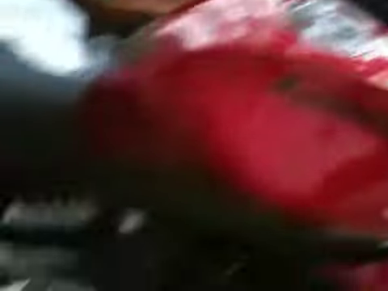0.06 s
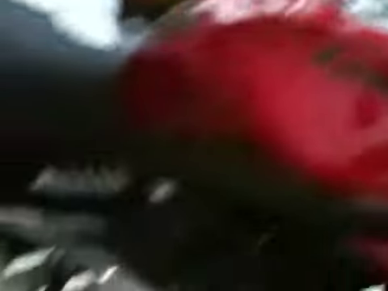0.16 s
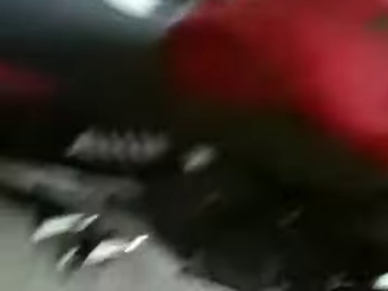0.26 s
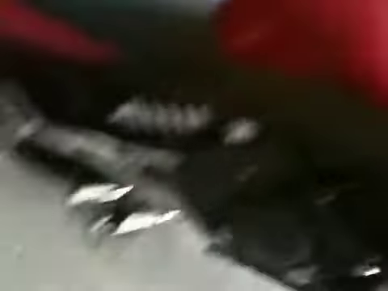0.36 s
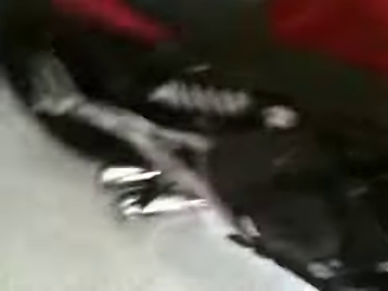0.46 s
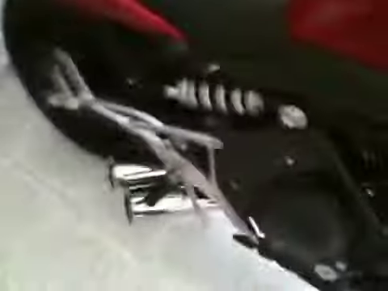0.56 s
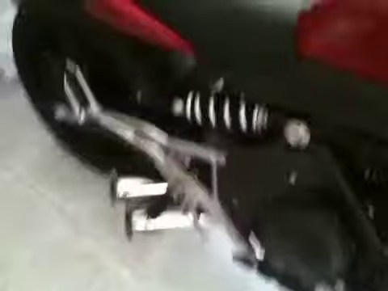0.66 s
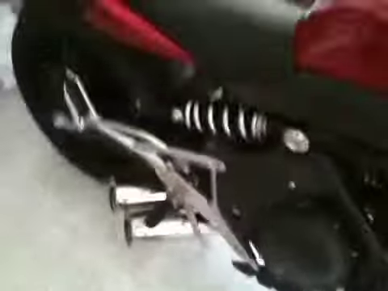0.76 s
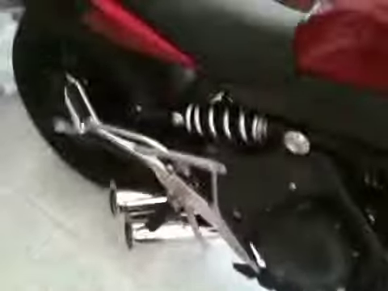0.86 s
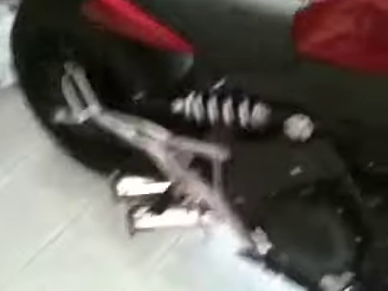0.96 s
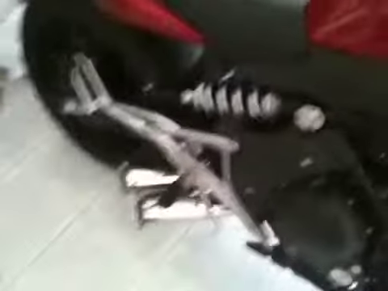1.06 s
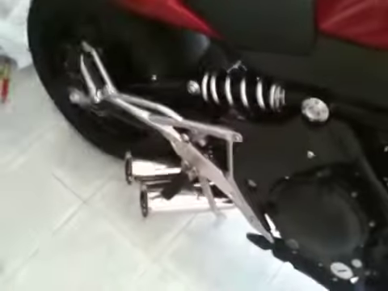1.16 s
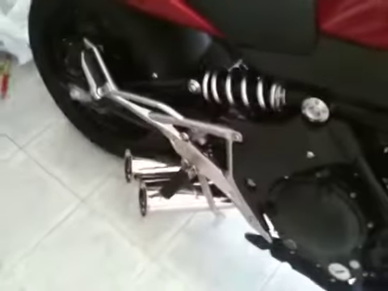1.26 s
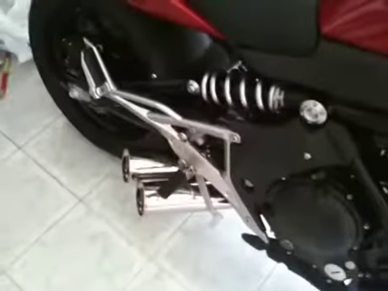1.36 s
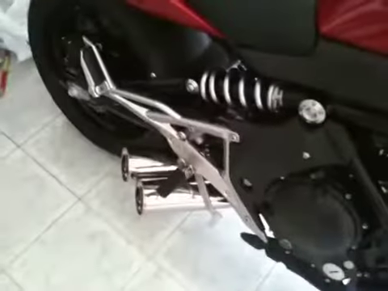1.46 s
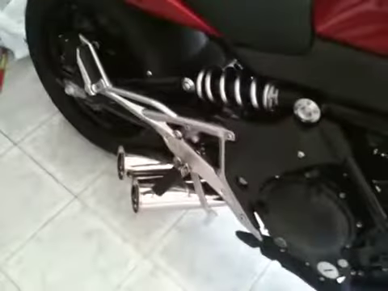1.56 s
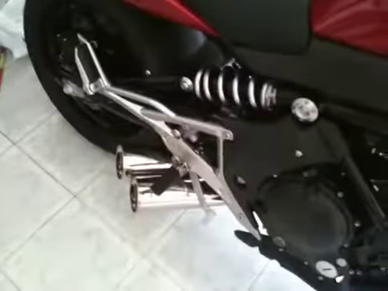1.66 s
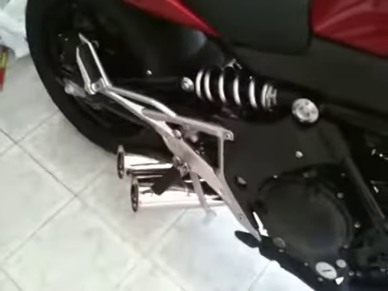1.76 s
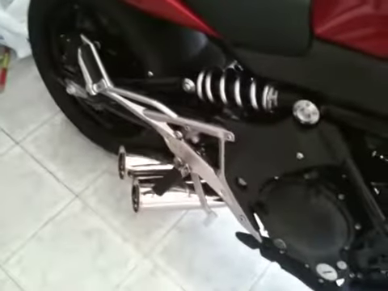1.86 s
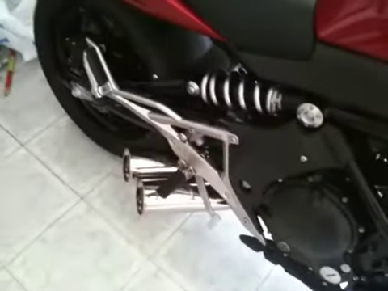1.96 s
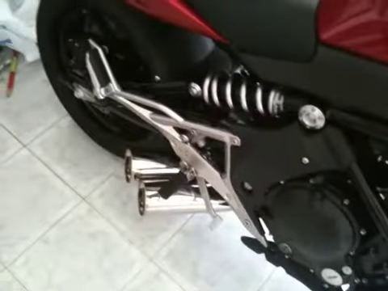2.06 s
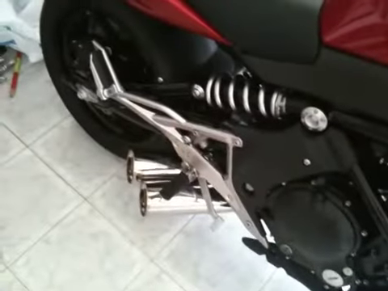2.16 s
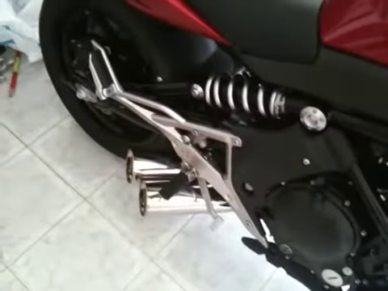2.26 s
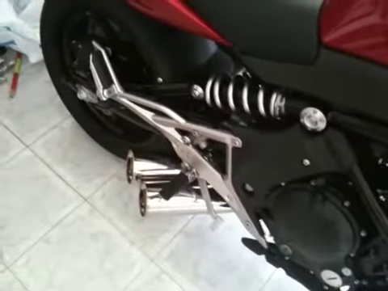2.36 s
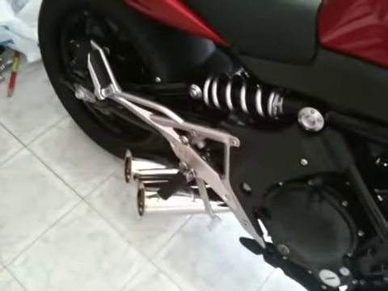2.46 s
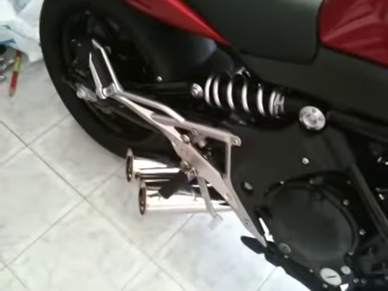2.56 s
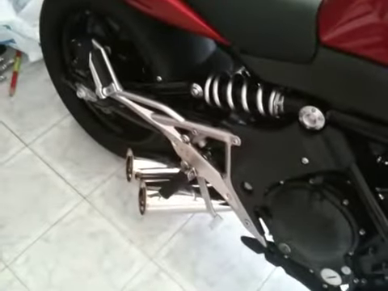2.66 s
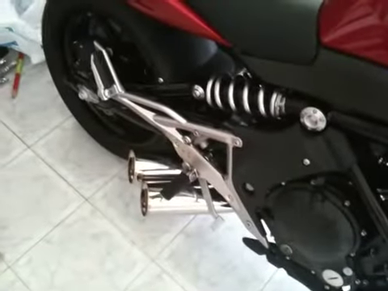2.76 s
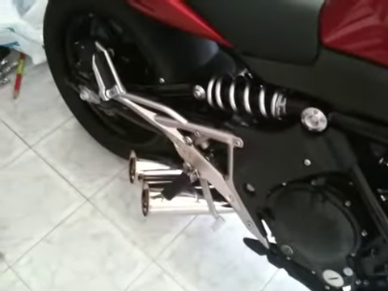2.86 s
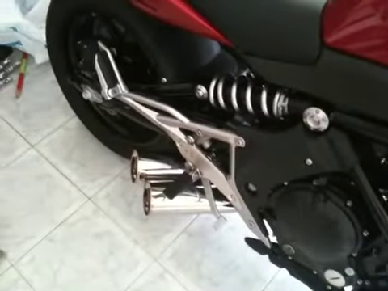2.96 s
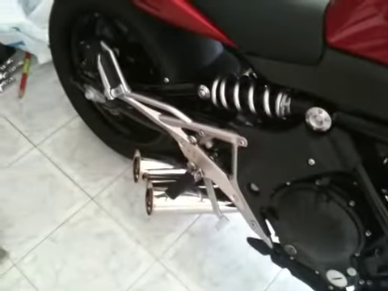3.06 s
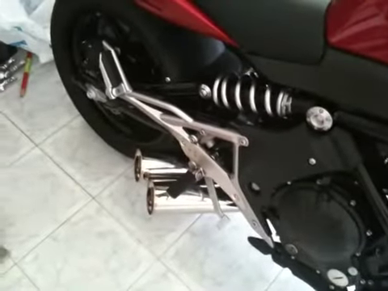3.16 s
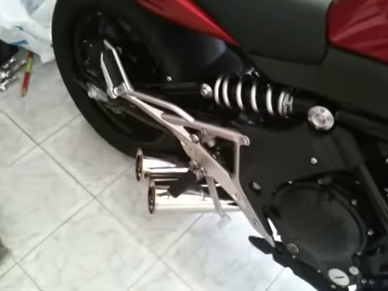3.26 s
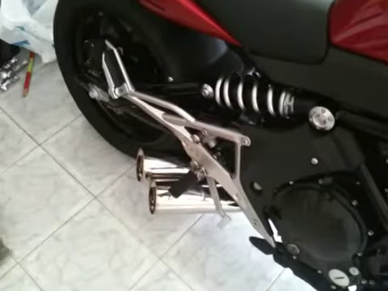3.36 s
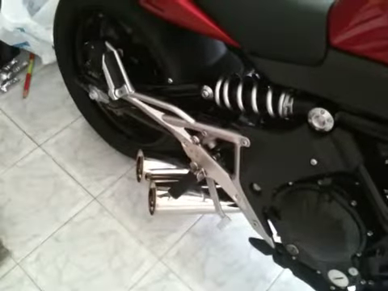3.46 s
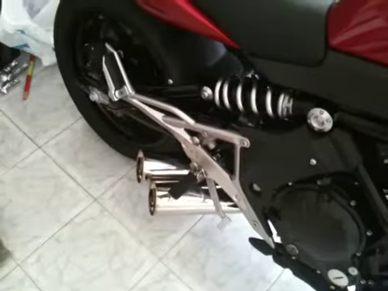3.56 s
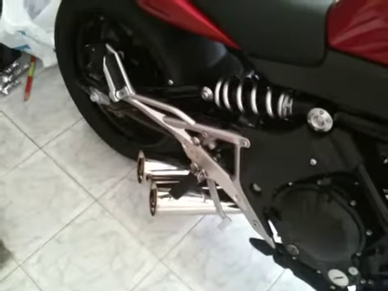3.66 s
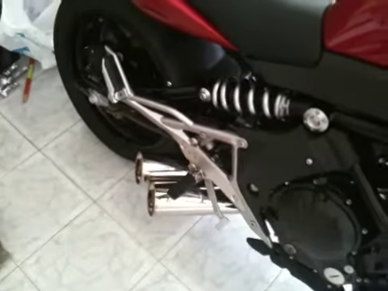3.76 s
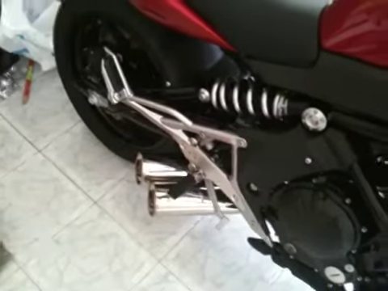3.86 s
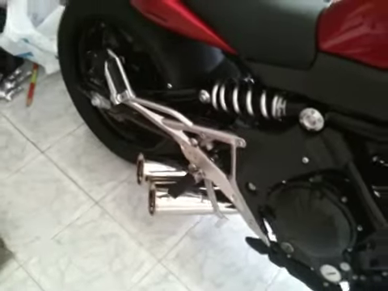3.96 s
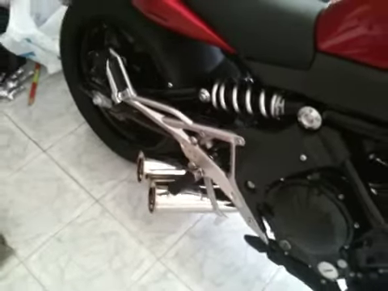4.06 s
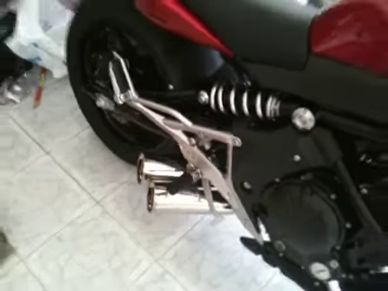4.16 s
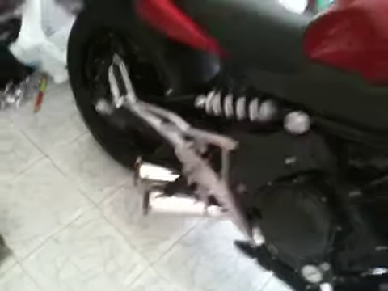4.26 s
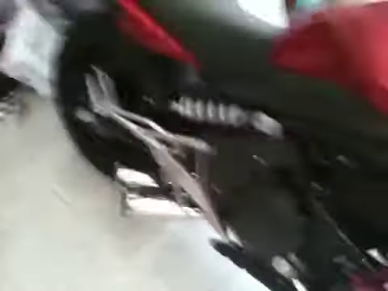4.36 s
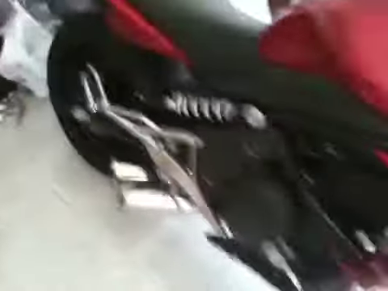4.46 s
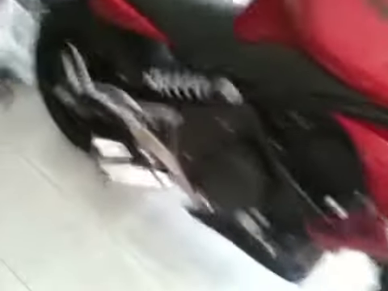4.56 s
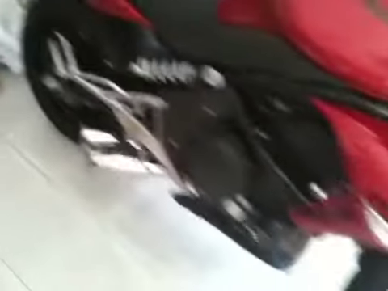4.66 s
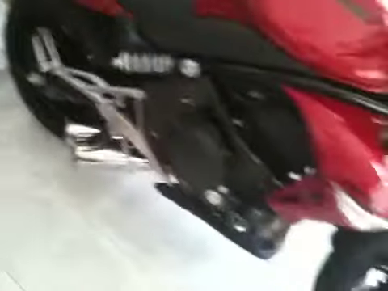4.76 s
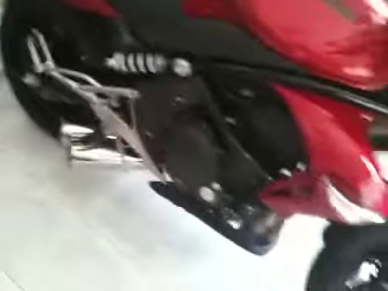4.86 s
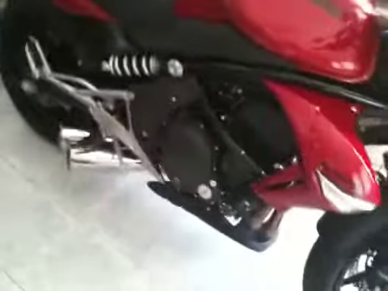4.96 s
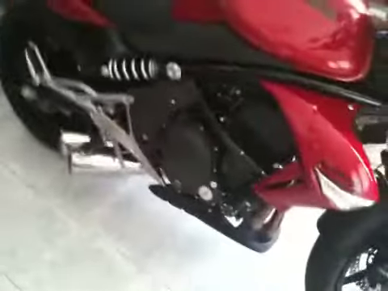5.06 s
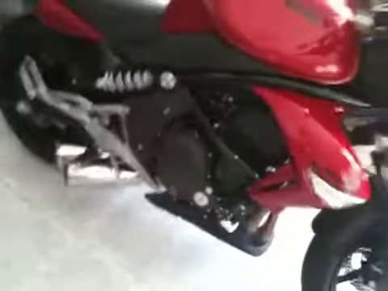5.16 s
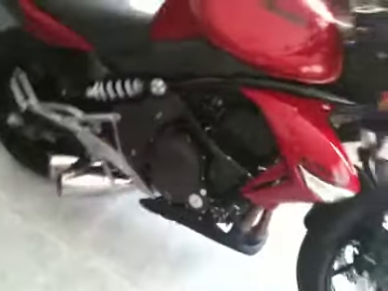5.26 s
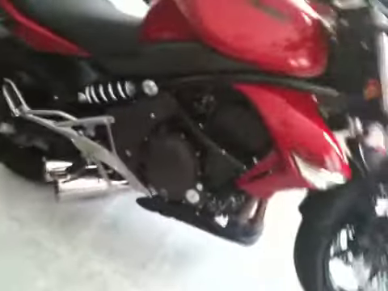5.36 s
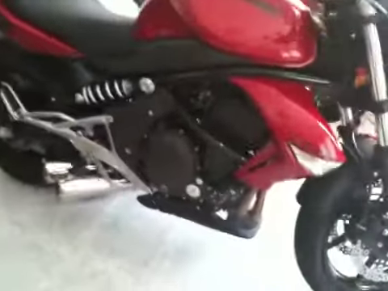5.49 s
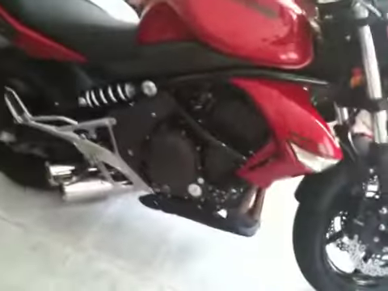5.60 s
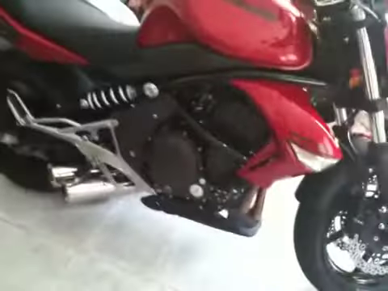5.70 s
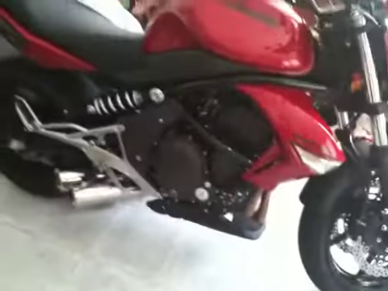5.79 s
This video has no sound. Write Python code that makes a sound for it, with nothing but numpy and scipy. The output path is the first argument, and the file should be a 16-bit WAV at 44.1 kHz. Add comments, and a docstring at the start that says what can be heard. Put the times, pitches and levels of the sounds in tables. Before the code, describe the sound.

A motorcycle is started in a tiled room, heard from close by. First come a few soft footsteps and a thin ignition whine, then a click and a short burst of cranking. The engine fires, falters with a few pops and picks up to a fast, throaty idle that echoes in the room. Its metallic ticking grows clearer as the microphone moves along the bike.

```python
"""Shoes tap and scuff softly in a tiled room, then a four-cylinder motorcycle starts up and idles.
The starter clacks and whines through two compressions; the engine catches, stumbles and runs.
Its uneven firings make the short exhaust pipe and the room boom and bark, while the valves rattle.
The tone shifts as the microphone moves along the bike, and the loudest peaks overload it softly."""
import sys
import numpy as np
from scipy import signal
from scipy.fft import rfft, irfft, next_fast_len
from scipy.io import wavfile

SR = 44100
rng = np.random.default_rng(int(sys.argv[2]) if len(sys.argv) > 2 else 0)


def wrap_up_sound(samples):
    """Save the sound to the file named by the first command line argument, as 16-bit audio."""
    columns = np.atleast_2d(samples).T
    # keep every value between -1 and 1, then stretch to whole-number steps
    tamed = np.clip(columns, -1, 1)
    steps = np.round(tamed * 32767).astype(np.int16)
    wavfile.write(sys.argv[1], SR, steps)


N = 257103
TIME = np.arange(N) / SR


# stray bangs of late-burning fuel: (time [s], boom level [dB], crack level [dB])
STRAY_BANGS = [(2.37, -14.5, 3), (2.3857, -1.5, 5), (2.41, -4, 5), (2.456, -8, 1), (2.47, -6, -22),
               (2.557, -14, -20), (2.576, -23, -23), (2.7311, -5, 1), (3.033, -20, 1), (3.533, -28, 1.5),
               (3.671, -28, 5.5), (4.696, -10.5, 4.5)]
def exhaust(s, boom_db, crack_db):
    """Each firing lets out a burst of gas, heard as a low boom, a sharp bark and a rushing puff."""
    bang_s, bang_boom_db, bang_crack_db = np.transpose(STRAY_BANGS)
    boom = pipe_boom(clicks(s, boom_db) + clicks(bang_s, bang_boom_db))
    return boom + bark(s, crack_db) + puffs(s, crack_db, clicks(bang_s, bang_crack_db)) + chuffs()


# notes at which pipe and room ring: (pitch [Hz], width [Hz], level at microphone place 0, 1, 2 [dB])
PIPE_NOTES = [(111.8, 28, -5.5, -12.5, -13), (141.9, 6, 0.5, -8, -1), (179.5, 20.4, -1, 0.5, -6),
              (249.1, 10.9, -1.5, -1, 5.5), (275.6, 6.25, 5.5, 4.5, 2), (304, 20.2, -7, -1.5, -11.5),
              (360.9, 14.3, -2.5, -2.5, -8), (413.3, 21.6, -46, -13, -9), (472, 55, -27.5, -22, -14.5),
              (610, 74, -24, -31, -23.5)]
def pipe_boom(pulses):
    """Pulses ring standing waves, which swell and sink as the microphone moves through them."""
    place, _ = microphone_path()
    ring = sum((-1) ** k * np.interp(place, [0, 1, 2], amp(db)) * resonate(pulses, hz, width)
               for k, (hz, width, *db) in enumerate(PIPE_NOTES))
    muffled = signal.sosfilt(signal.butter(2, 1300, fs=SR, output="sos"), ring)
    return amp(45) * signal.sosfilt(signal.butter(4, 95, "highpass", fs=SR, output="sos"), muffled)


# tone of the bark: (frequency [Hz], relative level [dB])
BARK_TONE = [(100, -44), (250, -14), (480, -3.5), (720, 6), (1050, -2), (1450, -10), (2000, -21.5),
             (4000, -20), (16000, -55)]
def bark(s, crack_db):
    """Cracks from the pipe mouth echo round the room, fading as the microphone leaves for the engine."""
    place, _ = microphone_path()
    cracks = colour(clicks(s + 0.001019, crack_db), BARK_TONE)
    return amp(-24.5 - 2.5 * place) * steady(room(cracks, wet_db=2.2, sway_hz=0.26))


# tone of rushing gas, also used for the valve knock: (frequency [Hz], relative level [dB])
RUSH_TONE = [(150, -54.5), (450, 13), (800, 0), (1200, -1), (1800, 3.5), (2400, -5), (3200, -11),
             (4500, -16.5), (8000, -21.5), (16000, -35)]
def puffs(s, crack_db, bangs):
    """A puff of swirling gas trails each firing and bounces off the floor tiles."""
    lag_s, echo_s, rise_s, fall_s = 0.0021, 0.0068, 0.0008, 0.005
    _, near_db = microphone_path()
    jets = clicks(s + lag_s, crack_db) + clicks(s + lag_s + echo_s, crack_db - 13.5) + bangs
    flow = fade(fade(jets, fall_s), rise_s)
    rush = colour(flow * rng.standard_normal(N), RUSH_TONE)
    return amp(-29 + near_db) * steady(room(rush, wet_db=-5))


# pushes of air: (time [s], level [dB])
AIR_PUSHES = [(2.085, -40), (2.158, -35), (2.2, -43), (2.28, -55), (2.5, -16.5), (2.547, -19), (2.578, -28)]
# their dull tone: (frequency [Hz], relative level [dB])
CHUFF_TONE = [(40, -36.5), (75, -17), (120, 6.5), (190, 2), (300, -12), (700, -40), (3000, -78)]
def chuffs():
    """Cylinders that do not fire pump out plain air while the engine cranks and stumbles."""
    return fade(clicks(*np.transpose(AIR_PUSHES)), seconds=0.038) * noise(CHUFF_TONE)


# the four firings of one engine cycle: (point in the cycle [0-1], boom level [dB], crack level [dB])
FIRING_PATTERN = [(0, -2.5, 1), (.24, 0, -7.5), (0.52, -5, -19.5), (.746, -5.5, -14.5)]
def firings():
    """Time, boom level and crack level of every firing; no two burn quite alike."""
    points, cylinder_boom_db, cylinder_crack_db = np.transpose(FIRING_PATTERN)
    s = cycle_times(points)
    late, strong, sharp, whole_cycle = rng.standard_normal((*s.shape, 4)).transpose(2, 0, 1)
    boom_db = burn(s) + cylinder_boom_db + 1.84 * strong
    crack_db = 1.9 * burn(s) + cylinder_crack_db + 1.8 * sharp + 0.4 * whole_cycle[:, :1]
    return s + 0.00018 * late, boom_db, crack_db


# the engine catches, picks up and wavers around its idle: (time [s], speed [turns per minute])
ENGINE_SPEED = [(2.3455, 1260.8), (2.635, 1226.2), (2.9, 1681.7), (3.06, 1643.9), (3.24, 1710.7),
                (3.32, 1639.2), (3.62, 1764.2), (3.76, 1713.2), (4.28, 1786.3), (4.32, 1745.9),
                (4.64, 1780.5), (5.14, 1766.1), (5.18, 1721.3), (5.54, 1679.4), (5.8, 1829.4)]
CATCH_S = ENGINE_SPEED[0][0]
def cycle_times(points):
    """When the engine passes the given points of its two-turn cycle; one row for each cycle."""
    rpm, = curves(ENGINE_SPEED)
    cycles = np.cumsum(rpm * (TIME >= CATCH_S)) / (60 * 2 * SR)
    wanted = np.arange(np.ceil(cycles[-1]))[:, None] + np.maximum(points, 1e-6)
    return np.interp(wanted, cycles, TIME, right=2 * TIME[-1])


def burn(s):
    """Burn strength in dB: the first charge burns well, then the engine starves until fuel arrives."""
    fuel_s, recover_s = 2.62, 0.78
    starving = -1.5 - 401 * (s - CATCH_S) ** 2
    recovering = -1.5 * np.exp(-abs(s - fuel_s) / recover_s)
    return np.where(s < fuel_s, starving, recovering)


# ticks of the valves closing: (point in the cycle [0-1], level [dB])
VALVE_TICKS = [(.035, 1), (.12, -6), (0.271, 0.5), (.335, -7), (.53, -2.5), (.82, -1)]
# tone of the rattle: (frequency [Hz], relative level [dB])
RATTLE_TONE = [(200, -14), (600, 2), (1200, 4), (1900, 0.5), (2400, -2), (3300, -2), (4500, -6.5),
               (6500, -6.5), (8500, -8), (11000, -12), (14000, -19), (16000, -21)]
# notes of the metal cover over the valves: (pitch [Hz], width [Hz], relative level [dB])
COVER_NOTES = [(1175, 85, -6.5), (1555, 420, -5.5), (2300, 290, -5.5)]
def valve_gear():
    """Valves tick over the sizzle of the chain that drives them; close by, their cover rings."""
    _, near_db = microphone_path()
    rpm, = curves(ENGINE_SPEED)
    tick_s, knock_s = cycle_times(np.transpose(VALVE_TICKS)[0]), cycle_times([0.0418])
    tick_db = np.transpose(VALVE_TICKS)[1] + 1.26 * rng.standard_normal(tick_s.shape)
    ticks, chain = steady(fade(clicks(tick_s, tick_db), seconds=0.0055)), amp(6.5)
    # the rattle grows with engine speed and softens when the burn is weak
    effort = (TIME > CATCH_S) * (rpm / np.median(rpm)) ** 0.65 * amp(0.25 * burn(TIME))
    rattle = steady(effort * (ticks + chain) * amp(2.66 * drift(hz=525)) * noise(RATTLE_TONE))
    # the loudest valve knocks straight on the cover
    knocks = clicks(knock_s, burn(knock_s) + 1.5 * rng.standard_normal(knock_s.shape))
    blows = rattle + amp(-5) * steady(colour(knocks, RUSH_TONE))
    cover = sum(amp(db + 2.24 * near_db - 5) * steady(resonate(blows, hz, width))
                for hz, width, db in COVER_NOTES)
    return amp(-32) * room(amp(0.042 * near_db) * rattle + cover, wet_db=-6)


# tones in the gear whine: (multiple of the rate at which teeth meet [x], relative level [dB])
GEAR_TONES = [(1, -0.5), (2, 0.5), (3, -15), (6, -15.5)]
# tone of the grinding gears: (frequency [Hz], relative level [dB])
WHIRR_TONE = [(35, -45.5), (60, -36), (98, -20), (168, -17), (212, -3), (515, -16.5), (698, -1.5),
              (968, -7), (1200, 2), (1410, 0.5), (1660, -5), (2050, -1.5), (5330, -10.5), (8320, -8.5),
              (16000, -22.5)]
# tone of the magnetic switch: (frequency [Hz], relative level [dB])
CLACK_TONE = [(200, -23), (1200, 4), (3000, 8), (4200, -2), (4800, 18), (5600, 0), (9000, -8), (16000, -23)]
def starter():
    """A magnetic switch clacks shut, then the gears of the starter motor grind and whine."""
    tooth_hz, whirr_gain, whine_gain = cranking()
    teeth = np.cumsum(tooth_hz * (1 + 0.032 * drift(hz=450))) / SR
    whine = unit(sum(amp(db + 3.5 * drift(hz=200)) * np.sin(2 * np.pi * k * teeth)
                     for k, db in GEAR_TONES))
    housing = resonate(resonate(rng.standard_normal(N), hz=8550, width=600), hz=8480, width=480)
    whirr = (noise(WHIRR_TONE) + amp(-11) * unit(housing)) * amp(1.9 * drift(hz=400) - 2.5)
    clack = fade(clicks([1.9155], [-24]), seconds=0.007) * noise(CLACK_TONE)
    # the switch's plunger thumps dully just before the contacts close
    thump = amp(-41.5) * np.exp(-((TIME - 1.905) / 0.033) ** 2) * np.sin(2 * np.pi * 215 * TIME)
    return room(whirr_gain * whirr + whine_gain * whine + clack, wet_db=-5.5) + thump


# a piston squeezes its air and slows the starter: (time [s], pitch it sags towards [Hz], load [dB])
SQUEEZES = [(2.062, 1040, 0), (2.273, 1250, 0)]
def cranking():
    """The starter spins up, labours through each squeeze and coasts: its pitch, whirr and whine gains."""
    press_s, release_s, free_hz = 1.912, 2.38, 1900
    running, coasting = np.maximum(TIME - press_s, 0), np.maximum(TIME - release_s, 0)
    spin = 1 - np.exp(-running / 0.024)
    tooth_hz, load = free_hz * spin * np.exp(-coasting / 0.25), np.zeros(N)
    # the speed is lowest shortly after the load bites, and returns more slowly than it fell
    lag_s, slow_down_s, speed_up_s = 0.036, 0.044, 0.077
    rise_s, hold_s, fall_s = 0.0025, 0.019, 0.022
    for s, slowest_hz, db in SQUEEZES:
        t = TIME - s
        sag = np.exp(-((t - lag_s) / np.where(t < lag_s, slow_down_s, speed_up_s)) ** 2)
        tooth_hz *= 1 - (1 - slowest_hz / free_hz) * sag
        load += amp(db) * np.clip(t / rise_s, 0, 1) * np.exp(-np.maximum(t - hold_s, 0) / fall_s)
    first_surge = np.exp(-(running / 0.1) ** 2)
    turning = spin * amp(-69 * coasting)
    whirr_gain = turning * (amp(-35) + amp(-30.5) * first_surge + amp(-28) * load)
    whine_gain = turning * (amp(-32.5) * first_surge + amp(-21.5) * load)
    return tooth_hz, whirr_gain, whine_gain


# soles sliding: (time [s], level [dB], time to swell or fade [s])
SOLE_SCUFFS = [(0.394, -61, 0.048), (0.693, -56, 0.056), (1.102, -62, 0.071), (1.246, -58.5, 0.019),
               (1.645, -54, 0.052), (1.74, -58.5, 0.062)]
# heels landing: (time [s], level [dB])
HEEL_TAPS = [(.366, -60), (.384, -49.5), (1.079, -46.5), (1.24, -54.5), (1.703, -47.5)]
# tones of a scuff and of a tap: (frequency [Hz], relative level [dB])
SCUFF_TONE = [(240, -62), (400, -30), (426, -3), (730, -7.5), (817, 4.5), (962, -5.5), (1630, -3.5),
              (3330, -29), (8000, -39), (10400, -63), (17600, -120)]
TAP_TONE = [(300, -14), (900, -11), (2600, 8.5), (4500, -2), (9500, -4), (13000, -23), (16000, -28)]
def shoes():
    """Soles rub and heels strike softly on the tiles."""
    sliding = sum(amp(db) * np.exp(-((TIME - s) / swell_s) ** 2) for s, db, swell_s in SOLE_SCUFFS)
    taps = fade(clicks(*np.transpose(HEEL_TAPS)), seconds=0.0059)
    return room(sliding * noise(SCUFF_TONE) + taps * noise(TAP_TONE), wet_db=-0.5)


# thin electric tones: (pitch [Hz], level before the fade is applied [dB])
IGNITION_TONES = [(5082, -72), (6083, -77), (6982, -77)]
def ignition_whine():
    """A faint electric whine starts as the ignition comes on, then fades."""
    swell = np.interp(TIME, [0.71, 0.73, 0.82, 1.0, 1.12], [0, 2.2, 0.8, 0.4, 0])
    return swell * sum(amp(db) * np.sin(2 * np.pi * np.cumsum(hz * (1 + 0.0022 * drift(hz=120))) / SR)
                       for hz, db in IGNITION_TONES)


# tone of the quiet room: (frequency [Hz], relative level [dB])
HUSH_TONE = [(24, -63), (40, -38), (140, 1), (215, 8), (372, -6), (630, -8.5), (697, -14), (831, -13),
             (1120, -16), (2260, -19.5), (2840, -18), (4240, -22), (7360, -20), (8130, -24.5), (16000, -30)]
def room_hush():
    """A low background noise whose level wavers slightly."""
    return amp(-58.5) * noise(HUSH_TONE) * amp(drift(hz=8.2))


# how long the room echoes: (frequency [Hz], time to fade by 60 dB [s])
ECHO_TIMES = [(150, 0.96), (500, 0.55), (2000, 0.29), (6000, 0.47), (15000, 0.18)]
def room(x, wet_db, sway_hz=4.3, count=3):
    """Adds echoes off the hard walls, wet_db loud; they shift as the microphone sways."""
    wet = np.zeros(N)
    for k in range(count):
        echoes = rng.choice([-1., 1.], SR) * (rng.random(SR) < 3000 / SR) * (TIME[:SR] > 0.005)
        hz, t, bands = signal.stft(echoes, SR, nperseg=256)
        tail = signal.istft(bands * amp(-60 * t / read(ECHO_TIMES, hz)[:, None]), SR, nperseg=256)[1]
        share = np.sqrt(2 / count) * np.cos(np.pi * (sway_hz * TIME + k / count))
        wet += signal.fftconvolve(x * share, tail / np.linalg.norm(tail))[:N]
    return x + amp(wet_db) * wet


# where the microphone is: (time [s], place [0 = pipe mouth, 2 = engine])
MIC_PLACE = [(2.3, 0.69), (2.9, 0.15), (3.3, 0), (3.75, 0.97), (4.1, 1), (4.55, 1.67)]
# the engine's noise grows as the microphone nears it: (time [s], boost [dB])
MIC_NEARNESS = [(2.4, 0), (3.2, 0), (4.3, 0.5), (4.8, 3), (5.3, 2), (5.8, 4)]
def microphone_path():
    """The microphone moves along the bike: its place and its nearness boost at every moment."""
    return curves(MIC_PLACE)[0], curves(MIC_NEARNESS)[0]


def amp(db):
    """Turns decibels into a gain."""
    return 10 ** (np.asarray(db) / 20)


def unit(x):
    """Scales to an average (rms) level of 1."""
    return x / np.sqrt(np.mean(x ** 2) + 1e-20)


def steady(x):
    """Scales so that the second half, the settled idle, has an average (rms) level of 1."""
    return x / np.sqrt(np.mean(x[N // 2:] ** 2) + 1e-20)


def read(points, hz):
    """Looks up a table between its rows, on a log-frequency axis."""
    f, value = np.transpose(points)
    return np.interp(np.log(hz + 1), np.log(f), value)


def curves(rows):
    """Joins a table's rows into curves over time."""
    s, *columns = np.transpose(rows)
    return [np.interp(TIME, s, c) for c in columns]


def noise(tone):
    """Noise with the given tone, at level 1."""
    size = next_fast_len(N)
    gain = amp(read(tone, np.fft.rfftfreq(size, 1 / SR)))
    return unit(irfft(rfft(rng.standard_normal(size)) * gain, size)[:N])


def drift(hz):
    """A random wander at level 1, changing no faster than about hz."""
    return unit(signal.sosfilt(signal.butter(2, hz, fs=SR, output="sos"), rng.standard_normal(N)))


def colour(x, tone, size=4096):
    """Gives a sound the given tone; the filter rings only after each hit, never before."""
    log_gain = np.log(amp(read(tone, abs(np.fft.fftfreq(size, 1 / SR)))))
    response = np.fft.ifft(np.exp(np.conj(signal.hilbert(log_gain)))).real
    return signal.oaconvolve(x, response[:size // 2])[:N]


def clicks(s, db):
    """One-sample clicks at the given times and levels."""
    at = np.round(np.ravel(s) * SR).astype(int)
    return np.bincount(np.maximum(at, 0), amp(np.ravel(db)), N)[:N]


def fade(x, seconds):
    """Gives every click a dying tail."""
    return signal.lfilter([1], [1, -np.exp(-1 / (SR * seconds))], x)


def resonate(x, hz, width):
    """Rings at one pitch; a smaller width rings longer."""
    return signal.lfilter(*signal.iirpeak(hz, hz / width, SR), x)


def scene():
    """Everything that reaches the microphone, in one channel."""
    return (exhaust(*firings()) + valve_gear() + starter() + shoes() + ignition_whine() + room_hush())[None]


def record(dry):
    """The microphone rounds off the loudest peaks, and the very highest treble is cut."""
    ceiling, hardness = 0.735, 6.5
    rounded = dry / (1 + abs(dry / ceiling) ** hardness) ** (1 / hardness)
    treble_cut = signal.firwin(1023, 15950, window=("kaiser", 9), fs=SR)
    return signal.oaconvolve(rounded, treble_cut[None], "same")


dry = scene()
out = record(dry)
wrap_up_sound(out)
```